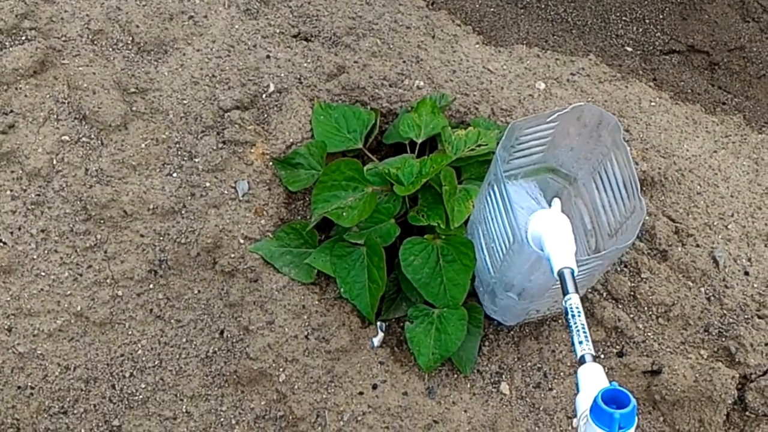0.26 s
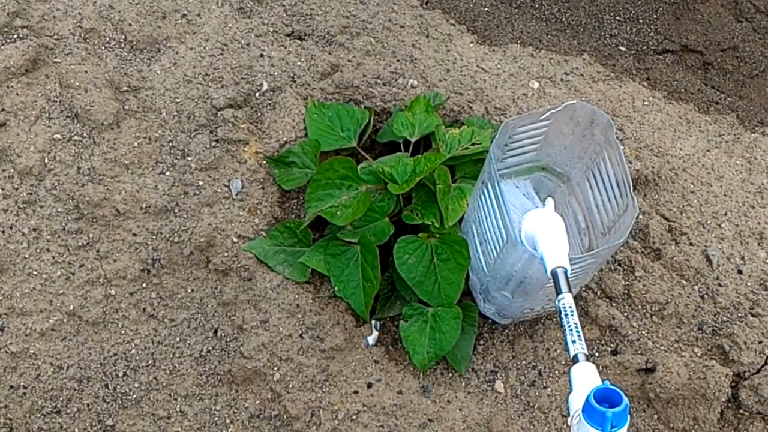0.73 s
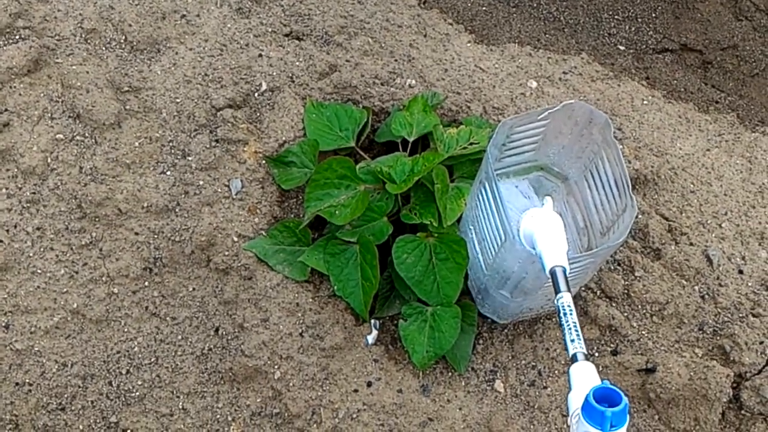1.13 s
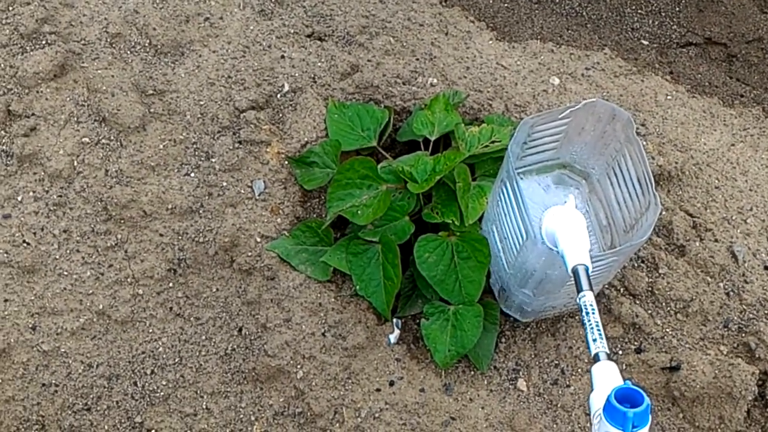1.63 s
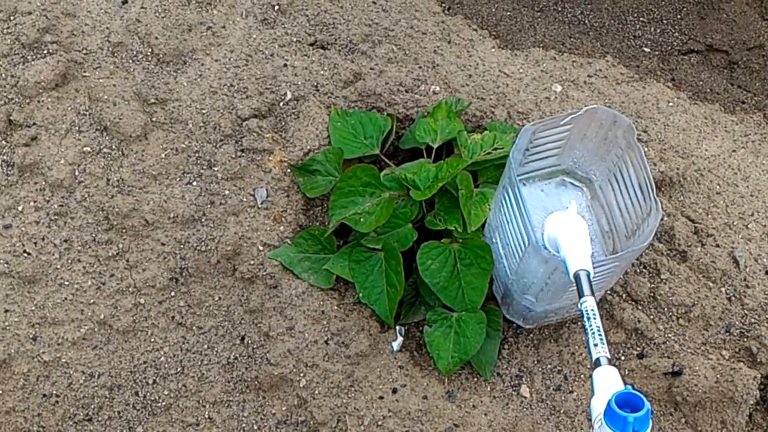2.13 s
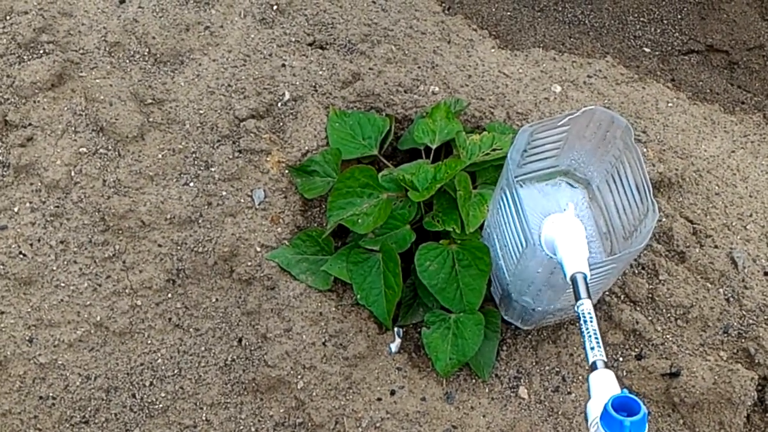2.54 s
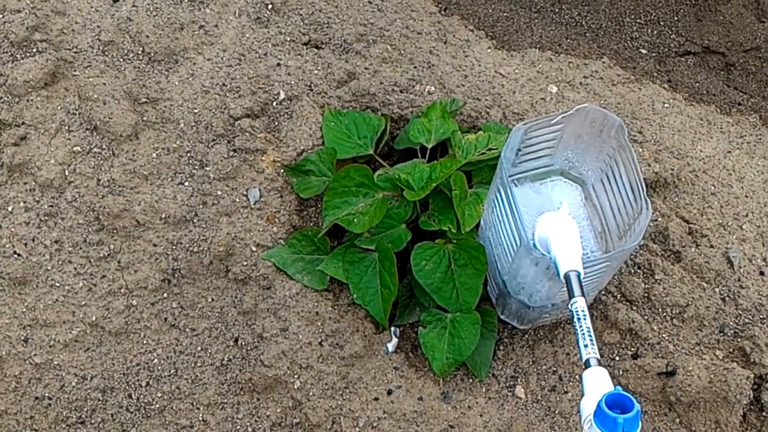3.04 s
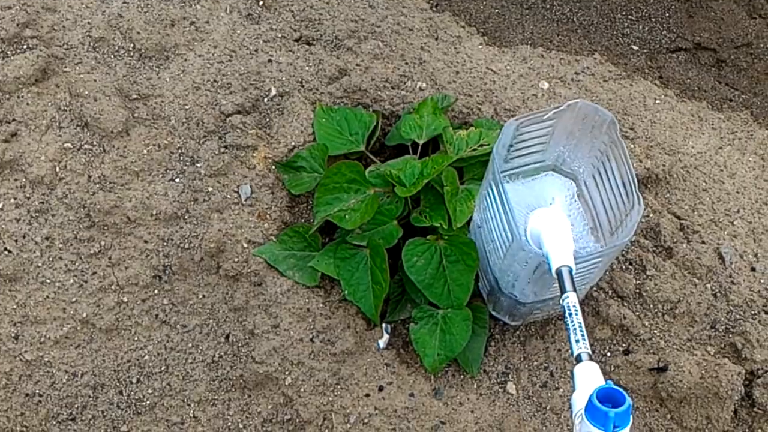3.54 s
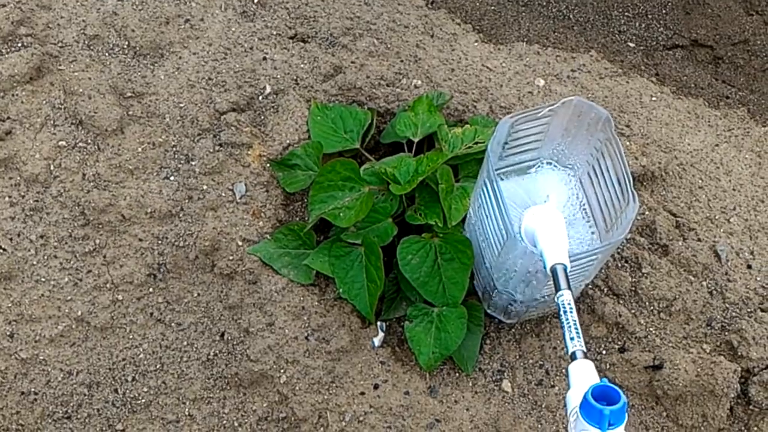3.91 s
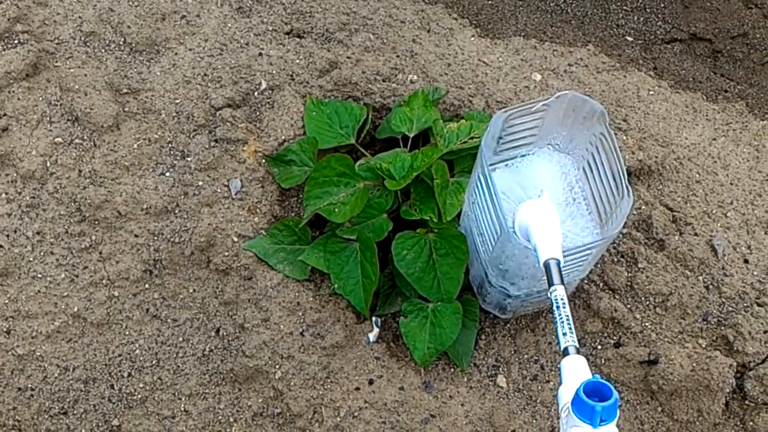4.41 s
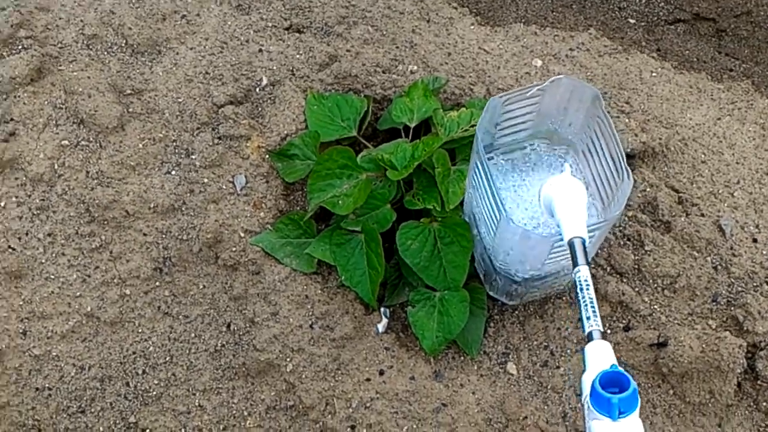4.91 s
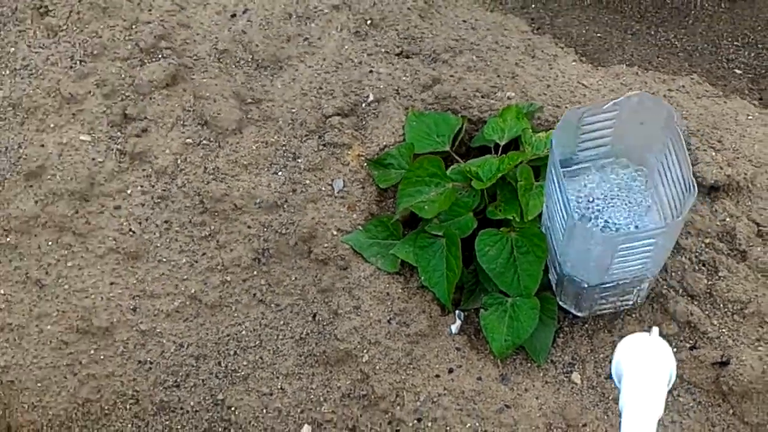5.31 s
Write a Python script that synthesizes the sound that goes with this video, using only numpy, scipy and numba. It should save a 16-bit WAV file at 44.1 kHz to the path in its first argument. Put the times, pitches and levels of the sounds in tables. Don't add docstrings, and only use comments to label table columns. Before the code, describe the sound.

Close, dense hiss of a fine spray filling a cut-off plastic bottle, with a faint hollow drumming that rises slightly in pitch. After about four and a half seconds a crisp valve click stops it at once. Very quiet foam fizz, tiny ticks, a brief rub on plastic, bubbly gulps and sand crunches follow. Open garden, soft low wind, slightly muffled small microphone, one channel.

```python
import sys
import numpy as np
from scipy import signal
from scipy.io import wavfile
from numba import njit

SR = 44100
rng = np.random.default_rng(int(sys.argv[2]) if len(sys.argv) > 2 else 0)


def generate_wav(signal):
    frames = np.transpose(np.atleast_2d(signal))
    scaled = np.clip(frames, -1, 1) * 32767
    pcm = np.round(scaled).astype(np.int16)
    wavfile.write(sys.argv[1], SR, pcm)


def decibels_to_gain(level_db):
    exponent = np.asarray(level_db, float) / 20
    return 10 ** exponent


N = 245195

# time in seconds, level in dB, tilt of the splash in dB per octave (finer spray is brighter).
JET_COURSE = [
    (0.0, -24, 0),
    (0.05, -25.5, -2),
    (0.09, -24.5, 0.5),
    (2.72, -25.5, 0.5),
    (3.66, -24.5, 0.5),
    (3.69, -25.5, 1),
    (4.25, -25.5, 1),
    (4.5, -27.5, 1.5),
    (4.6, -26.5, 0.5),
]
# time in seconds, flow in dB.
VALVE_CLOSING = [
    (4.6, -1),
    (4.618, -1),
    (4.63, -1.5),
    (4.65, -15.5),
    (4.678, -21),
    (4.692, -31),
    (4.73, -60),
]
# centre in Hz, width in Hz, gain in dB.
WALL_ECHOES = [(2560, 280, -1.5), (3030, 300, -9), (4475, 240, -5.5), (6260, 270, -8), (6760, 170, 2.5),
               (8100, 660, 4.5), (8680, 460, -6.5), (10740, 160, 6.5), (10330, 1400, 4.5), (12300, 450, -4)]
# Hz empty, Hz full, width in Hz, dB empty, dB full.
MOUTH_RESONANCES = [(765, 754, 198, -13.5, -10), (1290, 1400, 360, -20, -9), (1336, 1704, 430, -2, -0.5),
                    (1890, 1760, 260, -3, -4), (2062, 2200, 167, -9, -8)]
# Hz empty, Hz full, width in Hz.
BOTTLE_MODES = [(274, 320, 68), (456, 507, 82), (587, 620, 91), (970, 1106, 176)]
# dB empty, turning fill from 0 to 1, dB there, dB full.
MODE_DRIVE = [(-51, 0.32, -48, -59), (-48.5, 0.47, -42, -65), (-51.5, 0.43, -42, -43.5),
              (-40, .6, -42.5, -51.5)]
# peak time in seconds, half length in seconds, dB over the breeze.
WIND_GUSTS = [(.62, .08, 3), (1.7, 0.28, 5), (2.23, .07, 5), (2.647, .07, 4), (3.018, .1, 6),
              (3.164, .07, 9), (3.305, .09, 12.5), (3.313, .05, 6), (3.6, 0.21, 1.5), (3.885, 0.34, 7),
              (4.48, 0.19, 5), (5.0, 0.051, -0.5), (5.227, 0.048, 3), (5.43, 0.038, 4)]
# start in seconds, peak in dB, pitch in Hz.
GULPS = [
    (3.278, -28.5, 120),
    (5.236, -50, 100),
    (5.29, -43, 150),
    (5.335, -42, 403),
    (5.4, -46, 504),
    (5.412, -38, 219),
    (5.428, -37, 173),
    (5.447, -42, 447),
    (5.532, -42, 328),
]
# start in seconds, peak in dB, pitch in Hz, 60 dB decay in seconds, crackle share.
VALVE_SNAP = [
    (4.6195, -20, 2300, .016, .8),
    (4.62, -24, 1050, .014, .3),
    (4.6222, -23, 2800, .014, 1.1),
    (4.626, -25, 2200, .014, .5),
]
# start in seconds, peak in dB, pitch in Hz, 60 dB decay in seconds, crackle share.
DRIP_TICKS = [(4.645, -40, 1900, 0.01, 0.55), (4.666, -42, 1900, .012, .6), (4.731, -44, 1960, .015, .2),
              (4.96, -41, 1500, 0.0065, 1.4), (5.016, -50, 2300, .008, .4), (5.078, -42, 1750, .008, .2),
              (5.155, -44, 1900, .012, 0.55), (5.228, -52, 1820, 0.0092, 0.53),
              (5.272, -41, 2000, .006, 1.2), (5.288, -42, 1900, 0.0054, 1.4), (5.297, -47, 1700, .006, 1.3),
              (5.405, -49, 1700, .012, .8), (5.414, -42, 1400, .012, 0.93)]
# peak time in seconds, build-up in seconds, level in dB, brightness in dB.
SAND_STIRS = [
    (4.67, .03, -64, 1),
    (4.96, .012, -60, -3),
    (5.0, .04, -62.5, -1),
    (5.232, .014, -55.5, -4),
    (5.302, 0.096, -53, 1.5),
    (5.405, .02, -55, 0),
    (5.44, .03, -59.5, 3.5),
    (5.56, 0.16, -58, 1),
]
# centre in Hz, width in Hz, gain in dB.
OPEN_AIR_COLOUR = [(2920, 700, 3), (4330, 900, 6), (5600, 670, -4.5), (6500, 700, 6.5), (9900, 930, 11)]
# centre in Hz, width in Hz, gain in dB.
MIC_HOUSING = [(1900, 750, 8), (3334, 420, 6.5), (3980, 1235, -11.5), (4900, 536, 9.5), (5590, 640, 6),
               (7680, 1260, 3.5), (11750, 440, -6.5), (16500, 410, -22)]

FILL_S = 4.59
FIZZ_DB, BRIGHT_DB, SETTLE_DB_PER_S = -68.5, -66, 104
BREEZE_DB, RUMBLE_DB, RUMBLE_FOLLOWS = -49.5, -58.5, 0.26
RUSTLE_DB = -62
GULP_S, GULP_LENGTH_S, GULP_DB = 4.785, 0.07, -60
SCUFF_S, SCUFF_LENGTH_S, SCUFF_HZ, SCUFF_DB = 5.067, 0.036, 1750, -50
MEMBRANE_HZ, LEAK_DB = 8200, -26.5
SELF_NOISE_DB, AIRY_NOISE_DB = -72, -84


def rms_one(x):
    return x / np.sqrt(np.mean(x ** 2) + 1e-20)


def seconds():
    return np.arange(N) / SR


def in_time(rows):
    s, *columns = np.transpose(rows)
    return [np.interp(seconds(), s, column) for column in columns]


def band(x, low_hz, high_hz):
    return signal.sosfilt(signal.butter(2, [low_hz, high_hz], "band", fs=SR, output="sos"), x)


def colour(x, peaks):
    for hz, width_hz, gain_db in peaks:
        w, a, root = 2 * np.pi * hz / SR, np.pi * width_hz / SR, decibels_to_gain(gain_db / 2)
        above = [1 + a * root, -2 * np.cos(w), 1 - a * root]
        below = [1 + a / root, -2 * np.cos(w), 1 - a / root]
        x = signal.lfilter(above, below, x)
    return x


def drift(rate_hz):
    r = np.exp(-40 * np.pi * rate_hz / SR)
    noise = rng.standard_normal(N // 20 + 2002)
    slow = signal.lfilter([1], [1, -2 * r, r * r], noise)[2000:]
    return np.interp(np.arange(N) / 20, np.arange(len(slow)), rms_one(slow))


@njit
def resonate(x, w, r):
    y = np.zeros(len(x))
    for i in range(2, len(x)):
        y[i] = x[i] - x[i - 2] + 2 * r * np.cos(w[i]) * y[i - 1] - r * r * y[i - 2]
    return y


def mode(x, hz, width_hz):
    w = 2 * np.pi * hz / SR * np.ones(N)
    r = np.exp(-np.pi * width_hz / SR)
    once = rms_one(resonate(x, w, r))
    return rms_one(resonate(once, w, r))


def drops(per_s, spread_db):
    sizes = decibels_to_gain(spread_db * np.minimum(rng.exponential(1, N), 5)) * rng.choice([-1, 1], N)
    hits = rng.random(N) < per_s / SR
    return rms_one(sizes * hits + 1e-9)


def patchy(low_hz, high_hz, per_s, spread_db, shared_db, own_db, tilt_db):
    edges = np.geomspace(low_hz, high_hz, round(3 * np.log2(high_hz / low_hz)) + 1)
    rain = [drops(per_s, spread_db) + 0.73 * rng.standard_normal(N) for k in range(2)]
    together = shared_db * (drift(9.1) + 0.53 * drift(58.0))
    out = 0
    for k, (low, high) in enumerate(zip(edges, edges[1:])):
        own = own_db * (drift(2.3) + 0.41 * drift(39.0))
        gain_db = together + own + tilt_db * np.log2(low / 4000)
        out = out + decibels_to_gain(gain_db) * band(rain[k % 2], low, high)
    return rms_one(out)


def fill():
    return np.clip(seconds() / FILL_S, 0, 1)


def until(s):
    return np.clip(1 - (seconds() - s) / 0.069, 0, 1)


def spray():
    jet_db, tilt_db = in_time(JET_COURSE)
    flow_db = in_time(VALVE_CLOSING)[0]
    splash = patchy(1094, 16900, per_s=9000, spread_db=3.5, shared_db=0.5, own_db=0.23, tilt_db=tilt_db)
    full, churn = fill(), 0
    for empty_hz, full_hz, width_hz, empty_db, full_db in MOUTH_RESONANCES:
        water = drops(3000, 2.13) * decibels_to_gain(0.87 * drift(1.7))
        ringing = mode(water, empty_hz + (full_hz - empty_hz) * full, width_hz)
        churn = churn + decibels_to_gain(empty_db + (full_db - empty_db) * full) * ringing
    both = decibels_to_gain(-0.5) * splash + decibels_to_gain(-7 - 3 * full) * churn
    return decibels_to_gain(jet_db + flow_db) * colour(both, WALL_ECHOES)


def bottle():
    out, full = 0, fill()
    for (empty_hz, full_hz, width_hz), (empty_db, turn, turn_db, full_db) in zip(BOTTLE_MODES, MODE_DRIVE):
        level_db = np.interp(full, [0, turn, 1], [empty_db, turn_db, full_db])
        hz = empty_hz + (full_hz - empty_hz) * full
        ringing = mode(drops(1500, 2.73), hz, width_hz)
        out = out + decibels_to_gain(level_db + 0.68 + 0.44 * drift(17.0)) * ringing
    return decibels_to_gain(0.73 * in_time(VALVE_CLOSING)[0]) * out


def wind():
    t, gust_db = seconds(), 0
    for s, half_s, over_db in WIND_GUSTS:
        gust_db = gust_db + over_db * np.clip(1 - np.abs(t - s) / half_s, 0, 1)
    low = rms_one(band(rng.standard_normal(N), 13, 61)) * decibels_to_gain(1.2 * drift(7.1))
    upper = rms_one(band(rng.standard_normal(N), 60, 210)) * decibels_to_gain(1.1 * drift(12.0))
    rustle = decibels_to_gain(RUSTLE_DB) * rms_one(band(rng.standard_normal(N), 190, 1650))
    return decibels_to_gain(BREEZE_DB + gust_db) * low + decibels_to_gain(RUMBLE_DB + RUMBLE_FOLLOWS * gust_db) * upper + rustle


def knock_and_gulps():
    out, t = np.zeros(N + 4096), np.arange(4096) / SR
    for s, peak_db, hz in GULPS:
        tone = np.sin(2 * np.pi * hz * t * (1 + 1.7 * t)) * (1 - np.exp(-t / 0.0018))
        out[round(s * SR):][:4096] += decibels_to_gain(peak_db - 60 * t / 0.043) * tone
    return out[:N]


def snap_and_ticks():
    out, t = np.zeros(N + 2048), np.arange(2048) / SR
    for s, peak_db, hz, t60, crack in VALVE_SNAP + DRIP_TICKS:
        body = np.sin(2 * np.pi * hz * t) + crack * rng.standard_normal(2048)
        out[round(s * SR):][:2048] += decibels_to_gain(peak_db - 60 * t / t60) * body
    return band(out[:N], 420, 9600)


def stirring():
    t, dull, bright = seconds(), decibels_to_gain(FIZZ_DB), decibels_to_gain(BRIGHT_DB)
    for s, build_s, peak_db, brightness_db in SAND_STIRS:
        settling = decibels_to_gain(peak_db - SETTLE_DB_PER_S * np.maximum(t - s, 0))
        shape = np.clip(1 + (t - s) / build_s, 0, 1) * settling
        dull = np.maximum(dull, shape)
        bright = np.maximum(bright, decibels_to_gain(brightness_db) * shape)
    return dull, bright


def foam_and_sand():
    dull, bright = stirring()
    fizz = patchy(245, 3320, per_s=900, spread_db=4.0, shared_db=-1.1, own_db=3.5, tilt_db=0.0)
    crunch = patchy(3460, 17640, per_s=4700, spread_db=-2.0, shared_db=0.3, own_db=0.0, tilt_db=-2.0)
    grains = colour(decibels_to_gain(4) * dull * fizz + decibels_to_gain(5) * bright * crunch, OPEN_AIR_COLOUR)
    swell = np.sin(np.pi * np.clip((seconds() - GULP_S) / GULP_LENGTH_S, 0, 1))
    air_hum = (decibels_to_gain(-67) * until(4.8) + decibels_to_gain(GULP_DB) * swell) * mode(drops(2000, 2.0), 610, 70)
    mouth_hum = decibels_to_gain(-66) * until(5.5) * mode(drops(1200, 2.4), 1870, 350)
    return (1 - until(4.64)) * (grains + air_hum + mouth_hum)


def scuff():
    phase = np.clip((seconds() - SCUFF_S) / SCUFF_LENGTH_S, 0, 1)
    return decibels_to_gain(SCUFF_DB) * np.sin(np.pi * phase) ** 0.6 * mode(drops(2500, 1.9), SCUFF_HZ, 1400)


def scene():
    water = spray() + bottle()
    after = knock_and_gulps() + snap_and_ticks() + foam_and_sand() + scuff()
    return (water + wind() + after)[None]


def roll_off(x):
    return signal.sosfilt(signal.butter(12, 15730, fs=SR, output="sos"), x)


def record(dry):
    housed = colour(dry, MIC_HOUSING)
    dull = signal.sosfilt(signal.cheby1(6, 0.5, MEMBRANE_HZ, fs=SR, output="sos"), housed)
    hiss = decibels_to_gain(SELF_NOISE_DB) * rms_one(band(rng.standard_normal(N), 2500, 10300))
    airy = decibels_to_gain(AIRY_NOISE_DB) * rms_one(band(rng.standard_normal(N), 11500, 17000))
    return roll_off(dull + decibels_to_gain(LEAK_DB) * housed + hiss + airy)


dry = scene()
out = record(dry)
generate_wav(out)
```